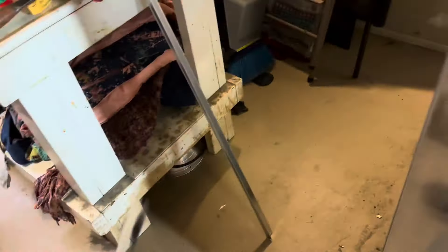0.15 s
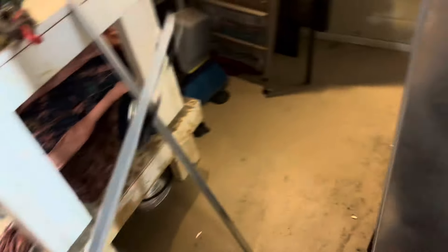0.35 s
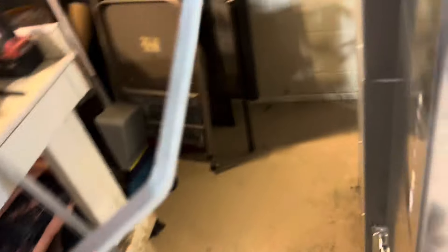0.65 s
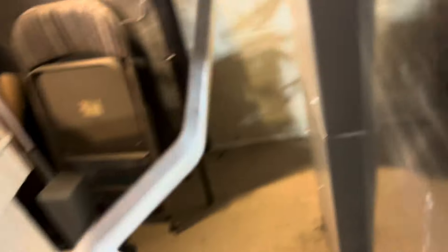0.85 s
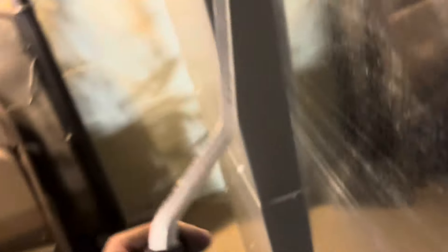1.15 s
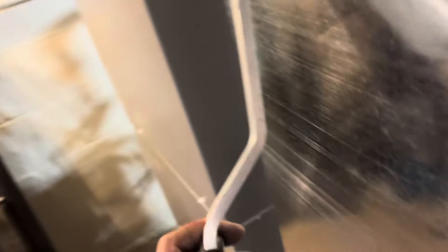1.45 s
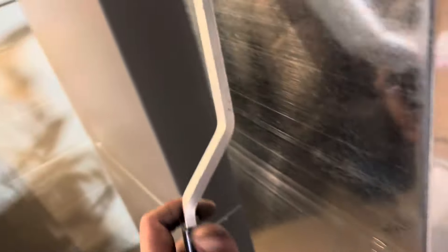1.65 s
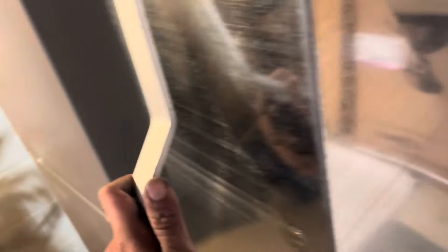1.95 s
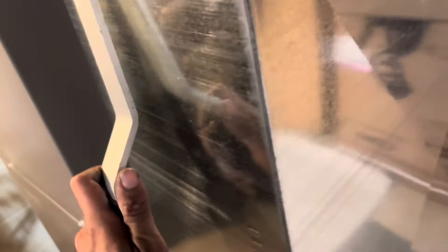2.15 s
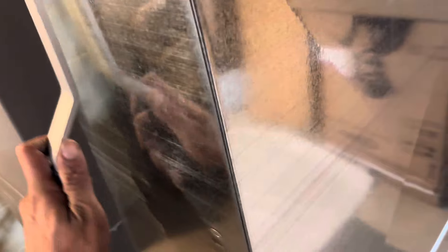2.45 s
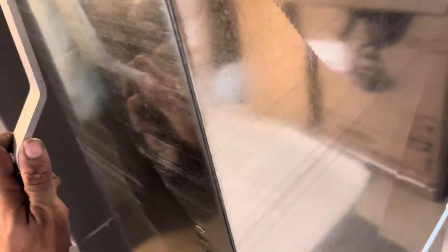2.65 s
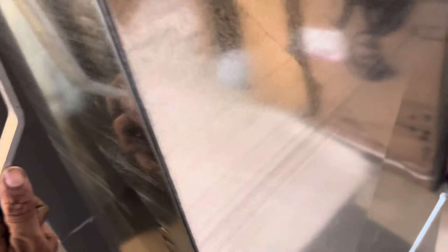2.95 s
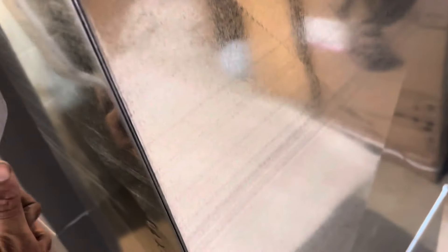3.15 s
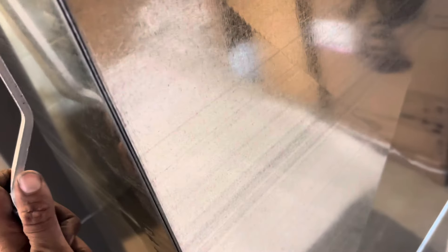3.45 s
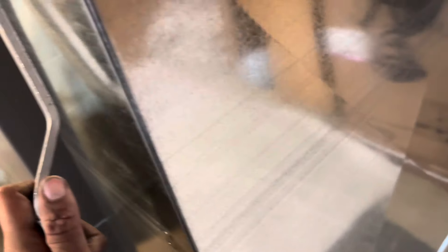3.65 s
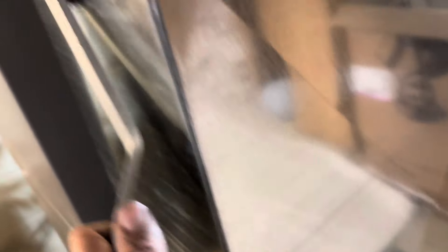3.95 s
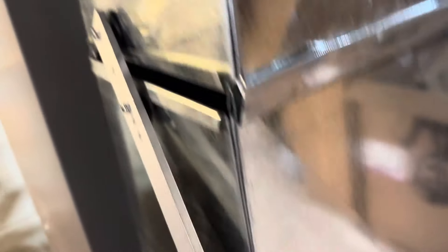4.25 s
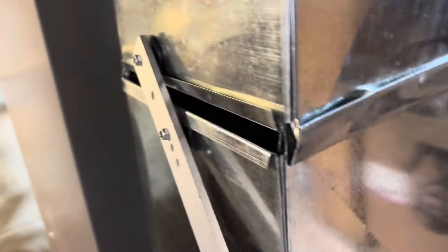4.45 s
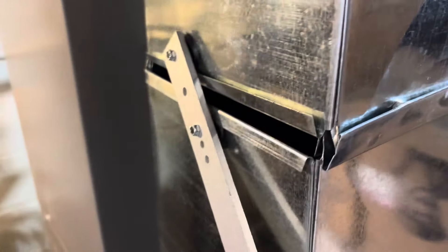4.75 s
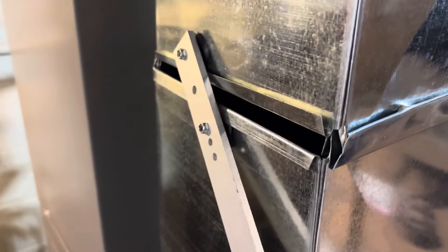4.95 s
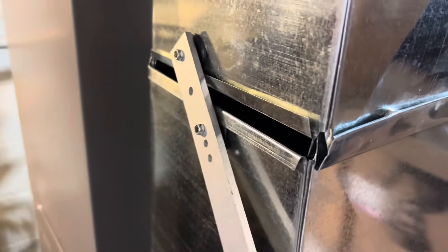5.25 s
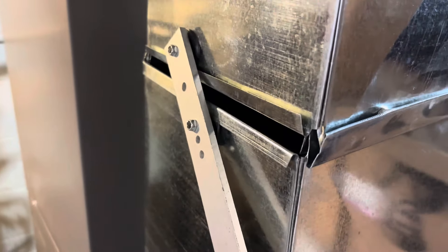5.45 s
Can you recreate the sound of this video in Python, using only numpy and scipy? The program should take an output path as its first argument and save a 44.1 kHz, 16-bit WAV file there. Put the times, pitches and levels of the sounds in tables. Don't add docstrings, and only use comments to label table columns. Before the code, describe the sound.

Thin sheet-metal duct pieces are scraped, knocked and rattled by hand in a bare basement, with booming panels and a creaking seam.

```python
import sys
import numpy as np
from scipy import signal
from scipy.fft import rfft, irfft, next_fast_len
from scipy.io import wavfile
from scipy.ndimage import uniform_filter1d

SR = 44100
rng = np.random.default_rng(int(sys.argv[2]) if len(sys.argv) > 2 else 0)


def unload_audio(sound):
    columns = np.transpose(np.atleast_2d(sound))
    steps = np.round(np.clip(columns, -1, 1) * 32767)
    wavfile.write(sys.argv[1], SR, steps.astype(np.int16))


def decibels_to_gain(level_db):
    exponent = np.asarray(level_db, float) / 20
    return 10 ** exponent


N = 246513


def evened(x):
    return x / np.sqrt(np.mean(x ** 2) + 1e-20)


def read(points, hz):
    f, value = np.transpose(points)
    return np.interp(np.log(hz + 1), np.log(f + 1), value)


def add(mix, s, sound):
    part = mix[:, round(s * SR):][:, :sound.shape[-1]]
    part += sound[..., :part.shape[1]]


def colour(x, gain):
    size = next_fast_len(x.shape[-1])
    return irfft(rfft(x, size) * gain(np.fft.rfftfreq(size, 1 / SR)), size)[..., :x.shape[-1]]


def shelves(hz, body_db, sizzle_db):
    return body_db / (1 + (hz / 1600) ** 4) + sizzle_db / (1 + (8000 / (hz + 1)) ** 4)


def sides(a, b):
    return np.array([a, a, b])


def summed(db):
    return np.sqrt((decibels_to_gain(db) ** 2).sum(0))


# (time [s], blow [dB], body [dB], sizzle [dB], time to fall 60 dB [s])
SHARP_KNOCKS = [(0.4794, -43.5, -6.5, -16, 0.11), (1.312, -21, -19, -2, 0.2), (1.6005, -43, -8, -30, 0.04),
                (2.0605, -43.5, 0, 8, 0.6), (2.5304, -33, -14.5, -33, 0.26),
                (2.7346, -27.5, -13, 1.5, 0.11), (2.801, -29, -21, -7, 0.4),
                (2.8785, -22.5, -17.5, -8, 0.2), (2.8944, -19.5, -10, 2.5, 0.14),
                (3.2878, -47, -13.5, -36, 0.1), (3.2923, -41, -12, -30, .1), (3.2963, -40, -15, -30, .2),
                (3.5617, -36, -14, -18, .12), (1.3155, -27, -18, -8, .08), (.2165, -50, -25, 16, .015),
                (1.779, -44, -1, -40, .06), (1.797, -46, -3, -40, .06), (3.9662, -22.5, -18.5, -15, 0.23),
                (4.7484, -33.5, -12, -4, 0.067), (4.9651, -52, 3, -1, 0.11), (5.1075, -36.5, -15, -4, 0.11),
                (5.1916, -42, -14, -3, 0.1)]
# (time [s], blow [dB], body [dB], sizzle [dB], time to fall 60 dB [s])
GLANCING_BUMPS = [(0.9944, -50, -25, 14, 0.15), (1.5348, -40, -7, -30, 0.067), (1.737, -32, -14, -8, 0.22),
                  (1.9042, -46, 1, -24, 0.27), (2.0759, -45.5, -29, -9, 0.23), (2.2092, -47, -12, -22, 0.1),
                  (2.3094, -48.5, -27, -3, 0.16), (2.9094, -25.5, -12, -12, 0.13),
                  (2.9514, -26, -11, -10, 0.26), (3.5575, -37, -13.5, -15, 0.14),
                  (3.953, -37, -22, -11, 0.38), (3.9894, -26, -2, -3, 0.075), (4.0089, -44, -4, -24, 0.28)]
# (frequency [Hz], level [dB])
STEEL_TONE = [(500, 5), (1000, 5.5), (2000, -1.5), (3500, -2.5), (5000, -2), (7000, -5.5), (9000, -1.5),
              (11000, -7), (13500, -9), (16000, -11)]
# (frequency [Hz], time to fall 60 dB [s])
STEEL_RINGING = [(500, 0.23), (1200, 0.54), (2500, 0.31), (5000, 0.16), (9000, 0.11), (14000, 0.073)]


def knocks():
    blows = np.array(list(SHARP_KNOCKS) + list(GLANCING_BUMPS))
    rises_s = [0.001] * len(SHARP_KNOCKS) + [0.005] * len(GLANCING_BUMPS)
    count = len(blows)
    t = (np.arange(15000) / SR).astype(np.float32)

    hz = (450 + 16000 * np.sort(rng.random(1500)) ** 1.1).astype(np.float32)
    fall = np.log(1000) / read(STEEL_RINGING, hz) * decibels_to_gain(0.9 * rng.standard_normal(len(hz)))
    fall = fall.astype(np.float32)
    modes = np.exp(-fall[:, None] * t) * np.sin(2 * np.pi * (hz[:, None] * t % 1))

    strength = rng.standard_normal((count, 2, len(hz)))
    strength = np.sign(strength) * np.sqrt(abs(strength))
    tilt_db = shelves(hz, blows[:, 2, None] + 6.36, blows[:, 3, None] + 4.8)
    strength *= decibels_to_gain(read(STEEL_TONE, hz) + tilt_db)[:, None]
    place = evened(uniform_filter1d(rng.standard_normal((count, 1, len(hz))), 20))
    strength *= decibels_to_gain(1.1 * place)

    rattle = evened(uniform_filter1d(rng.standard_normal((count, 2, len(t))), 90))
    sounds = strength.astype(np.float32) @ modes
    sounds = sounds * decibels_to_gain(3 * rattle * (1.5 - np.exp(-t / 0.015)))
    cracks = np.diff(rng.standard_normal((count, 2, len(t) + 1))) * np.exp(-t / 0.003)

    out = np.zeros((3, N))
    for (s, db, _, sizzle_db, t60), rise, pair, crack in zip(blows, rises_s, sounds, cracks):
        hand_db = -60 * t / (4.67 * t60)
        pair = pair * decibels_to_gain(db - 6 + hand_db) / np.sqrt(np.mean(pair[:, :400] ** 2))
        pair = pair + decibels_to_gain(db - 9 + min(sizzle_db, 0) / 2) * crack
        add(out, s - rise, sides(*pair) * (1 - np.exp(-(t / rise) ** 2)))
    return out


# (time [s], frequency [Hz], level [dB], time to fall 60 dB [s])
BAR_RINGS = [(2.736, 5750, -28, 0.03), (1.315, 4350, -25, 0.055), (1.32, 3620, -31, 0.1),
             (1.318, 1780, -35, 0.12), (1.316, 2350, -36, .1), (1.313, 8500, -25, 0.04),
             (1.32, 7600, -31, .04), (1.314, 13670, -46, .05), (1.74, 996, -37, 0.3),
             (1.746, 1227, -40, 0.35), (1.738, 1701, -38, 0.23), (1.74, 2353, -39, 0.14),
             (1.74, 2050, -41, .15), (2.803, 3700, -36, .06), (2.879, 8200, -26, .04),
             (2.879, 6500, -27, 0.04), (2.9, 3550, -29, .055), (2.948, 3585, -32.5, 0.062),
             (2.94, 1450, -37, 0.24), (2.9, 1800, -33, 0.28), (2.894, 13700, -34, .05), (3, 13420, -54, .1),
             (2.91, 13500, -47, 0.7), (3.968, 1351, -39, .24), (3.97, 2105, -41, 0.24),
             (3.97, 3575, -35, 0.13), (3.97, 4753, -39, .13), (3.97, 4371, -41, .2), (4.06, 1265, -44, .4),
             (4.07, 1157, -47, .4), (4.07, 894, -48, .6), (3.563, 3758, -44, .12), (3.563, 4323, -44, .11),
             (3.563, 5023, -46, .15), (3.568, 1125, -45, .2), (3.565, 2794, -48, .3),
             (3.296, 1346, -46, .12), (3.296, 3101, -46, .08), (3.296, 2649, -52, .2),
             (1.318, 1104, -35, .1), (1.6, 1750, -47, .04), (5.11, 8300, -38, .025),
             (5.108, 2900, -39, .06), (5.14, 1500, -52, .1), (2.91, 990, -36, .2), (2.91, 865, -38, .2),
             (1.33, 3600, -33, .05), (1.323, 1900, -33, .04), (2.736, 4100, -34, .02)]


def rings():
    out = np.zeros((3, N))
    for s, hz, db, t60 in BAR_RINGS:
        t = np.arange(4000 if t60 < 0.09 else 16000) / SR
        waver = 0.9 * evened(uniform_filter1d(rng.standard_normal((2, len(t))), 250))
        start_phase = 2 * np.pi * rng.random((2, 1))
        pair = decibels_to_gain(db - 60 * t / t60) * np.sin(2 * np.pi * hz * t + waver + start_phase)
        add(out, s, sides(*pair) * (1 - np.exp(-t / 0.001)))
    return out


# (time of fastest slide [s], rise [s], fall [s], rub [dB], body [dB])
RUB_STROKES = [(.065, .15, .2, -60, -3), (.14, .03, .06, -63, 5), (.19, .03, .05, -67, 6),
               (2.13, .04, .2, -64, 4), (2.83, .03, .12, -60, -32), (1.345, .02, .08, -56, -30),
               (1.75, .01, .1, -62, -28), (3.57, .01, .1, -66, -28), (5.115, .005, .1, -66, -28),
               (.4, .02, .15, -67.5, 1), (.5, .012, .06, -62, 0), (.6, .1, .14, -57.5, -5),
               (1.0, .01, .3, -58, -32), (1.073, .018, .1, -45, -6), (1.105, .06, .04, -38, -8),
               (1.308, .025, .01, -56, -3), (1.38, .05, .16, -46, 0), (1.5, .1, .3, -59, 0),
               (1.92, .05, .4, -67, -2), (2.34, .03, .3, -59, -12), (2.45, .13, .16, -54, 2),
               (2.56, .021, .05, -49, 5), (2.716, .006, .04, -54, -10), (3.034, .1, .27, -54.5, 1),
               (3.33, .03, .21, -61.5, 4), (3.64, .03, .11, -64.5, 0), (3.945, .07, .011, -60, -10),
               (4.1, .05, .2, -59, 8), (4.712, .45, .05, -66, 0), (4.8, .021, .28, -61, 2),
               (5.13, .04, .12, -60, -2), (4.98, .15, .1, -66, -9), (5.47, .06, .4, -67, 11)]


def rubs():
    s, rise, fall, db, body_db = np.transpose(RUB_STROKES)[..., None]
    t = np.arange(0, N / SR + 0.01, 0.001)
    fade_db = -20 * np.maximum((s - t) / rise, (t - s) / fall)

    def stroke(level_db):
        return np.interp(np.arange(N) / SR, t, summed(level_db))

    unevenness = evened(uniform_filter1d(rng.standard_normal(N), 60))
    surge = evened(uniform_filter1d(rng.standard_normal(N), 900))
    grit = rng.standard_normal((2, N)) * decibels_to_gain(1.7 * unevenness + surge)
    grit = colour(grit, lambda f: decibels_to_gain(read(STEEL_TONE, f)))

    body = evened(colour(grit, lambda f: 1 / (1 + (f / 2000) ** 6) / (1 + (700 / (f + 1)) ** 6)))
    chest = evened(colour(grit, lambda f: 1 / (1 + (2000 / (f + 1)) ** 6) / (1 + (f / 3600) ** 8)))
    middle = evened(colour(grit, lambda f: 1 / (1 + (3600 / (f + 1)) ** 8) / (1 + (f / 9500) ** 8)))
    sizzle = evened(colour(grit, lambda f: 1 / (1 + (9500 / (f + 1)) ** 8)))

    pair = middle * stroke(db - 1.5 + fade_db)
    pair += chest * stroke(db - 5 + 0.45 * body_db + fade_db)
    pair += body * stroke(db + body_db + 0.88 * fade_db)
    pair += sizzle * stroke(db - 6 - 0.4 * body_db + fade_db)
    return sides(*pair)


# (time [s], peak [dB], start frequency [Hz], end frequency [Hz], time to fall 60 dB [s])
DULL_THUMPS = [(.480, -23, 330, 262, 0.018), (.481, -40, 560, 426, 0.073), (.495, -37, 300, 200, 0.03),
               (.526, -32.5, 280, 220, 0.011), (1.22, -18, 106, 55, .11), (1.2535, -19, 105, 52, 0.095),
               (1.219, -30, 240, 200, .03), (1.295, -29, 200, 220, .05), (1.283, -17.5, 90, 60, .15),
               (1.807, -23.5, 86, 59.7, 0.04), (2.41, -37, 171.5, 161.7, 0.9), (2.73, -35, 185, 165, .5),
               (2.345, -37, 150, 140, .08), (2.925, -22, 103.2, 97.5, 0.36), (2.945, -31, 66.5, 60, 0.33),
               (2.9, -30, 165, 150, .12), (2.93, -29, 530, 515, .25), (2.97, -35, 335, 325, .2),
               (3.005, -26, 180, 190, .15), (3.105, -30, 100, 105, .2), (3.185, -32, 135, 120, .15),
               (3.24, -35, 105, 90, .12), (5.112, -36, 125, 120, .2)]


def thumps():
    t, out = np.arange(12000) / SR, np.zeros((3, N))
    for s, db, start_hz, end_hz, t60 in DULL_THUMPS:
        rise = 1.4 / start_hz
        hz = end_hz + (start_hz - end_hz) * np.exp(-t / (0.36 * t60))
        push = np.sin(np.pi / 2 * np.minimum(t / rise, 1)) ** 2
        push = push * decibels_to_gain(db - 60 * np.maximum(t - rise, 0) / t60)
        lead = 0.63 * (s < 2) * np.array([[0], [1], [1]])
        add(out, s, push * np.cos(2 * np.pi * np.cumsum(hz) / SR + lead))
    return out


# (frequency [Hz], width [Hz], level [dB])
PANEL_MODES = [(56.5, 14, -3), (75.4, 22, 2.5), (100.4, 9.9, 4.5), (118.5, 15.7, 4.5), (165.8, 11.7, 0),
               (189.1, 17.2, -1), (213.3, 13.2, -1.5), (243.6, 21, -11), (300, 14.6, 0.5), (330, 42, 3),
               (410, 29, 2.5), (438, 24.6, 0), (488.4, 27.6, 0), (540.2, 30, -3), (601.5, 40, -8),
               (690, 60, -11)]
# (time [s], middle panels [dB], large panels [dB], small faces [dB], time to fall 60 dB [s])
PANEL_JOLTS = [(.47, -38.5, -25, -7, .25), (1.06, -57, 3, 10, .35), (1.2, -38, -6, -13, .9),
               (1.25, -36, -6, -15, .5), (1.3, -42, 7, 3, .8), (1.47, -44, -4, -1, .9),
               (1.74, -46, 0, 7, .9), (1.83, -48, -5, 3, 2.3), (2.05, -52, -4, 9, 1),
               (2.25, -48, -3, -2, 1.5), (2.4, -46, 1, 0, 2.2), (2.54, -47, -4, 6, 1.2),
               (2.72, -41, -6, 0, 1.7), (2.885, -31, 1, 1, .7), (2.945, -33, 4, 4, .9),
               (3.1, -37.5, -1, -1, 2.1), (3.59, -55, -4, 9, .7), (3.96, -36.5, -3, 0, 1.6),
               (4.03, -38, 3, 2, 1.2), (4.6, -45, -1, -14, 1.9), (4.75, -44, -4, -7, 1.5),
               (5.09, -43, 2, -4, 1.3), (5.38, -44, 4, -6, 1.5), (5.55, -44, 4, -4, 1.5)]
# (large panels [dB], middle panels [dB], small faces [dB])
REST_TREMBLE = [8, 0, -6]
RINGING_SHARE = [1.25, 1.05, .75]


def wobble():
    s, db, large_db, small_db, t60 = np.transpose(PANEL_JOLTS)[..., None]
    t, out = np.arange(0, N / SR + 0.01, 0.002), np.zeros((2, N))
    rise_s = 0.03
    rise_db = db - 30 * np.maximum(1 - (t - s) / rise_s, 0) ** 2
    fall_db = -60 * np.maximum(t - s - rise_s, 0) / t60
    tremble_db = np.where(t < 1.25, -67, -54)[None]

    groups = (PANEL_MODES[:4], PANEL_MODES[4:8], PANEL_MODES[8:])
    sizes_db = (large_db, 0, small_db)
    for size_db, rest_db, share, group in zip(sizes_db, REST_TREMBLE, RINGING_SHARE, groups):
        def resonance(f):
            return sum(decibels_to_gain(level) / (1 + 1j * (f - hz) / (width / 2)) ** 1.62
                       for hz, width, level in group)

        sung = evened(colour(rng.standard_normal((2, N)), resonance))
        swells_db = np.vstack([rise_db + fall_db / share + size_db, tremble_db + rest_db])
        out += sung * np.interp(np.arange(N) / SR, t, summed(swells_db))
    return sides(*out)


# (time [s], level [dB])
SEAM_SLIPS = [(0.042, -50), (0.1356, -45), (0.2204, -50), (0.6346, -48), (2.2092, -52), (2.3094, -54),
              (3.889, -54), (5.3996, -57), (5.4124, -49.5), (5.4262, -48), (5.4364, -49), (5.4494, -46),
              (5.459, -44), (5.4722, -46), (5.4802, -47), (5.484, -46), (5.513, -42), (5.516, -43),
              (5.5288, -40), (5.5315, -44), (5.5445, -43), (5.547, -41), (5.5495, -43), (5.5885, -48)]
# (frequency [Hz], level [dB], time to fall 60 dB [s])
SEAM_MODES = [(1510, -2, 0.012), (2810, -1.5, 0.011), (3900, -6, .008), (5600, -13, 0.007),
              (7500, -4, 0.0051), (12100, -27, 0.0049), (13500, -21, 0.0043)]


def creaks():
    t, out = np.arange(1500) / SR, np.zeros((3, N))
    hz, mode_db, t60 = np.transpose(SEAM_MODES)[..., None]
    wait, size = rng.standard_normal((26, 2)).T
    creep_s = 4.3 + np.cumsum(0.016 * decibels_to_gain(3.5 * wait))
    slips = list(SEAM_SLIPS) + list(zip(creep_s, -55.5 + 2.5 * size))

    tears = signal.lfilter([1, 0.4], [1], rng.standard_normal((len(slips), len(t))))
    changes = rng.standard_normal((len(slips), 3, len(SEAM_MODES), 1))
    for (s, db), (shift, tilt, turn), tear in zip(slips, changes, tears):
        tone = np.sin(2 * np.pi * hz * (1 + 0.053 * shift) * t + turn)
        ring = (decibels_to_gain(mode_db - 3.5 + 2.2 * tilt - 60 * t / t60) * tone).sum(0)
        tear_s = 0.0013 * decibels_to_gain(0.56 * (db + 57))
        snap = 0.42 * tear * np.exp(-(t / tear_s) ** 2)
        add(out, s, decibels_to_gain(db - 3) * (ring + snap))
    return out


# (start [s], end [s], start frequency [Hz], end frequency [Hz], level [dB])
EDGE_SQUEALS = [(0.178, 0.215, 4900, 4800, -63), (.62, 0.774, 4900, 4800, -72),
                (0.479, 0.518, 2150, 2150, -54), (1.531, 1.56, 1800, 1790, -47),
                (1.595, 1.616, 1750, 1700, -46), (1.904, 1.975, 3390, 3440, -68),
                (4.28, 4.46, 1772, 2020, -63.5), (4.45, 4.72, 1970, 2490, -69),
                (4.502, 4.752, 5000, 4800, -67.5), (4.554, 4.673, 3900, 3720, -73),
                (4.775, 5.0, 4920, 4900, -72)]


def squeals():
    out = np.zeros((3, N))
    for start, end, start_hz, end_hz, db in EDGE_SQUEALS:
        size = round((end - start) * SR)
        turn = 2 * np.pi * np.cumsum(np.linspace(start_hz, end_hz, size)) / SR
        swing = colour(rng.standard_normal((2, 2, 12000)), lambda f: 1 / (1 + (2 * f / 480) ** 2))
        p, q = swing[..., :size]
        whistle = evened(p * np.cos(turn) + q * np.sin(turn))
        add(out, start, decibels_to_gain(db) * sides(*whistle) * signal.windows.tukey(size, 0.6))
    return out


# (frequency [Hz], time to fall 60 dB [s])
ROOM_RINGING = [(200, 1), (1000, 0.36), (4000, 0.23), (12000, .15)]


def room(x):
    taps = np.zeros((2, SR))
    at = np.arange(300, SR - 20, 20) + rng.integers(0, 20, (2, (SR - 301) // 20))
    np.put_along_axis(taps, at, rng.choice([-1., 1.], at.shape), 1)
    hz, t, z = signal.stft(taps, SR, nperseg=256)
    fading = z * decibels_to_gain(-60 * t / read(ROOM_RINGING, hz)[:, None])
    tail = signal.istft(fading, SR, nperseg=256)[1]
    tail = tail / np.linalg.norm(tail[0])
    return sides(*signal.fftconvolve(x[None], tail, axes=1)[:, :N])


# (frequency [Hz], level per Hz [dB])
AIR_TONE = [(25, -20), (60, -3), (110, 2.5), (250, -6), (450, -11), (700, -14.5), (1200, -19.5),
            (2000, -24), (3400, -31.5), (8500, -43), (13000, -47), (15500, -50), (17000, -51)]


def air():
    noise = colour(rng.standard_normal((2, N)), lambda f: decibels_to_gain(read(AIR_TONE, f)))
    return sides(*decibels_to_gain(-50.5) * evened(noise))


# (frequency [Hz], likeness [0 to 1])
PORT_LIKENESS = [(50, 0.99), (250, 0.93), (500, 0.77), (1000, 0.5), (1900, 0.1), (3000, 0.53), (4200, 0.61),
                 (5700, 0.36), (7000, .99), (10500, .985), (13000, 0.9)]
# (frequency [Hz], lead [radians])
PORT_LEAD = [(0, 0), (900, .6), (1900, 0), (3000, .3), (5700, -.4), (7000, 0), (7900, -.7), (9300, -2.8),
             (9700, -3.14), (10500, -3.3), (11900, -6.25), (13200, -6.35), (14900, -9.3), (17000, -9.5)]


def ports(left, twin, other):
    def same(f):
        return np.clip(read(PORT_LIKENESS, f), 0, 1)

    right = colour(twin, same) + colour(other, lambda f: np.sqrt(1 - same(f) ** 2))
    right = colour(right, lambda f: np.exp(-1j * np.interp(f, *np.transpose(PORT_LEAD))))
    return np.array([left, right])


def scene():
    steel, rub = knocks() + rings() + squeals() + creaks(), rubs()
    echo = decibels_to_gain(-5.5) * room(steel[0] + 0.35 * rub[0])
    return ports(*(steel + rub + echo + thumps() + wobble() + air()))


def roll_off(x):
    return signal.sosfilt(signal.butter(12, 16510, fs=SR, output="sos"), x)


def record(dry):
    mix = colour(dry, lambda f: 1 / (1 + (31 / (f + 1)) ** 4) / (1 + (f / 16520) ** 100))
    return roll_off(mix)


dry = scene()
out = record(dry)
unload_audio(out)
```